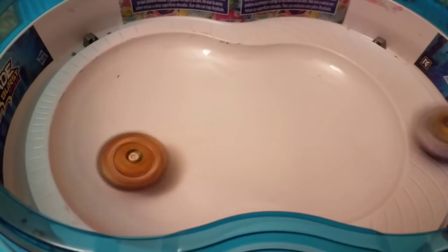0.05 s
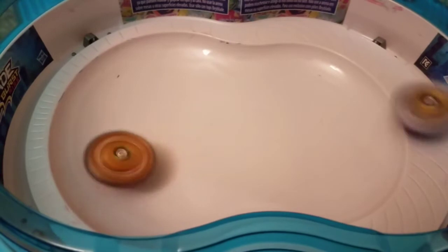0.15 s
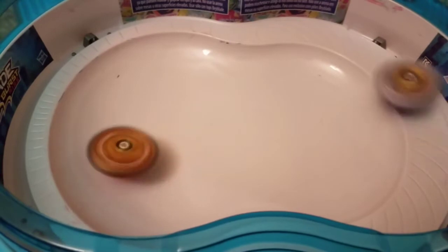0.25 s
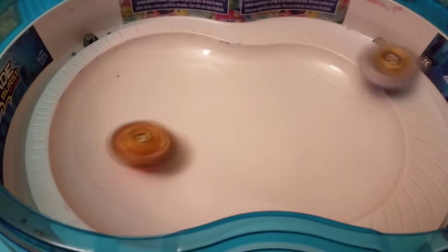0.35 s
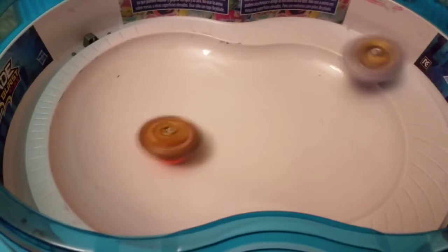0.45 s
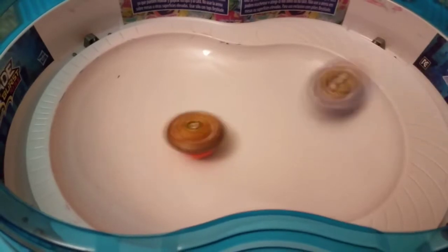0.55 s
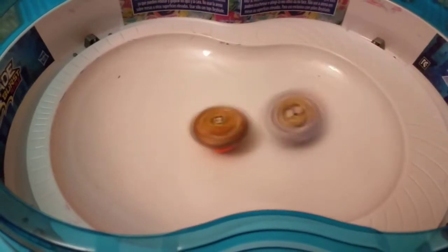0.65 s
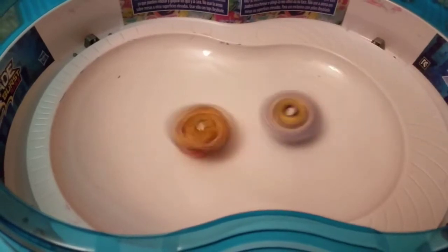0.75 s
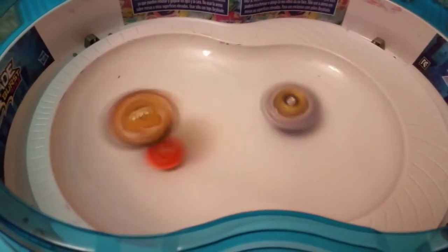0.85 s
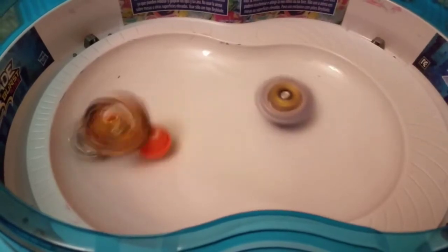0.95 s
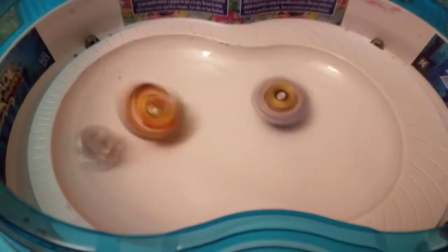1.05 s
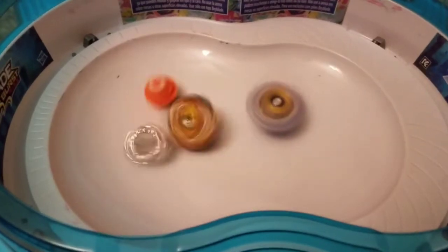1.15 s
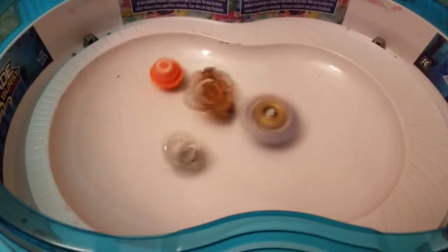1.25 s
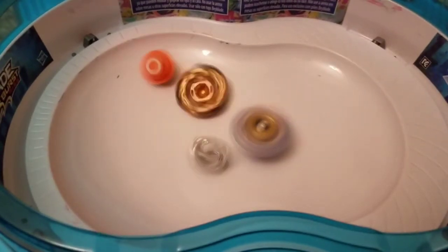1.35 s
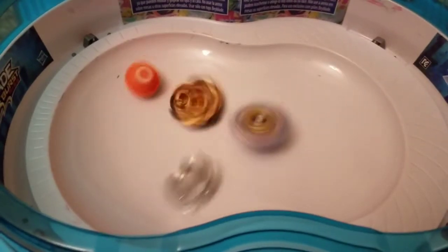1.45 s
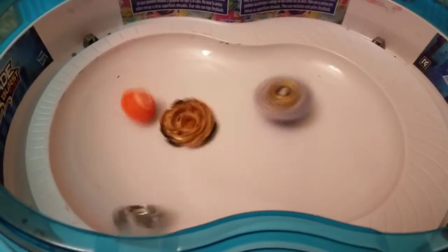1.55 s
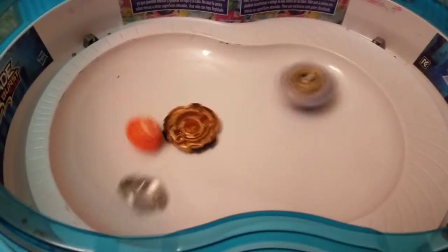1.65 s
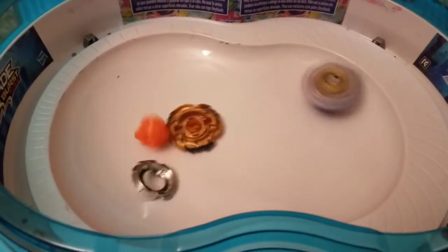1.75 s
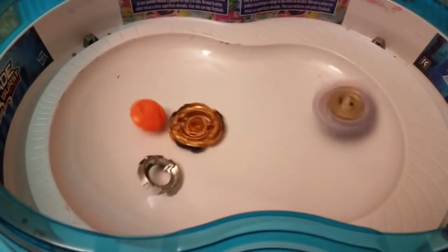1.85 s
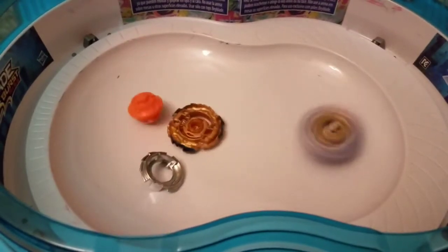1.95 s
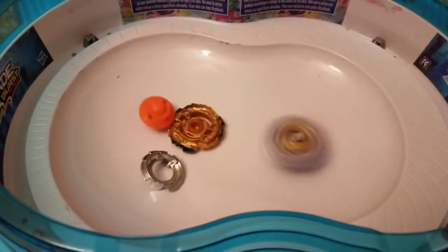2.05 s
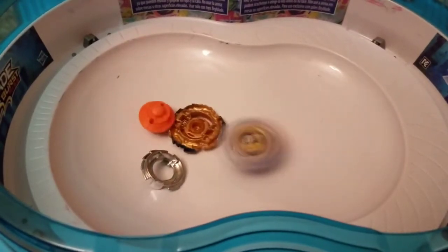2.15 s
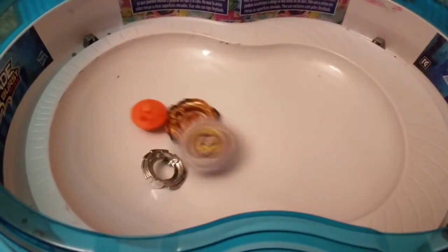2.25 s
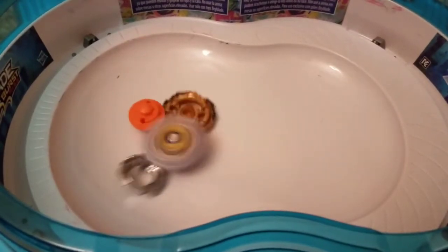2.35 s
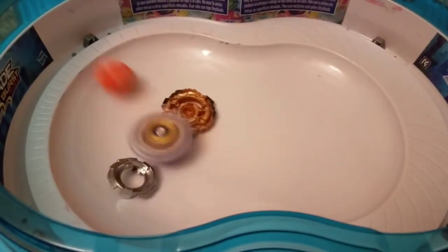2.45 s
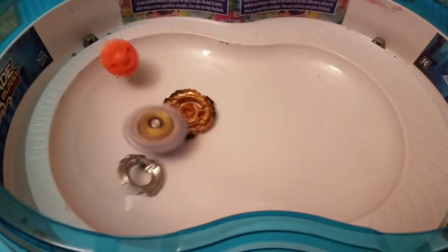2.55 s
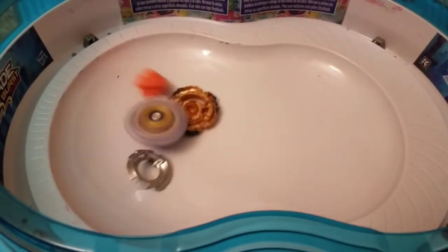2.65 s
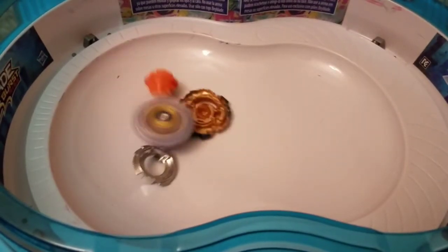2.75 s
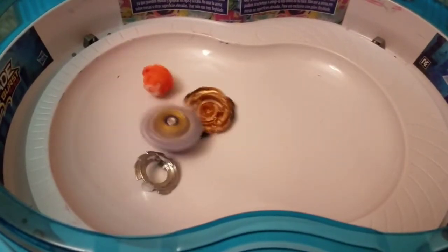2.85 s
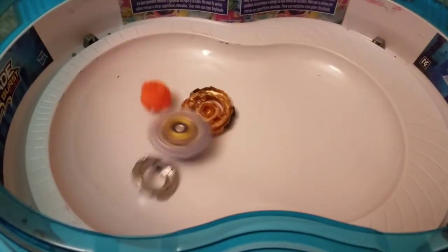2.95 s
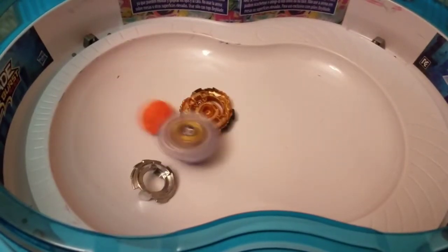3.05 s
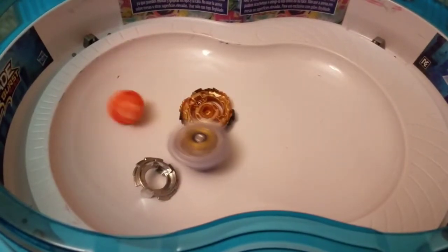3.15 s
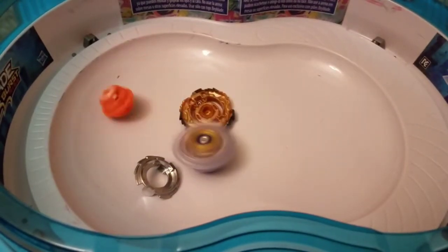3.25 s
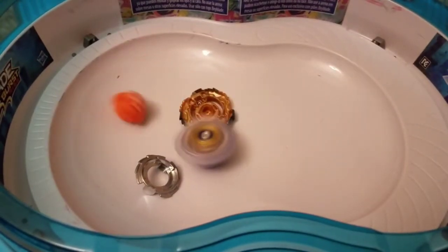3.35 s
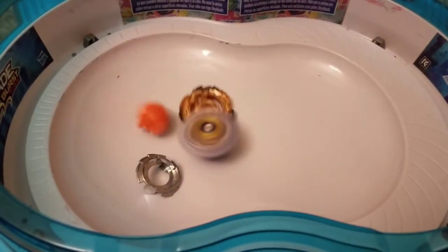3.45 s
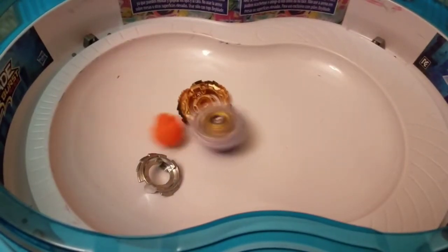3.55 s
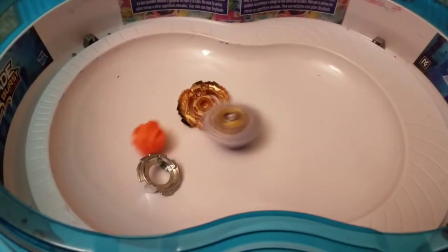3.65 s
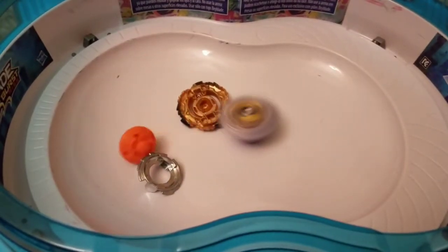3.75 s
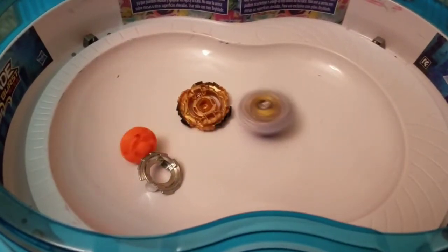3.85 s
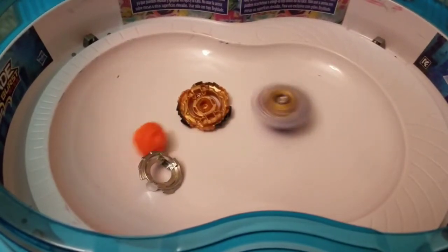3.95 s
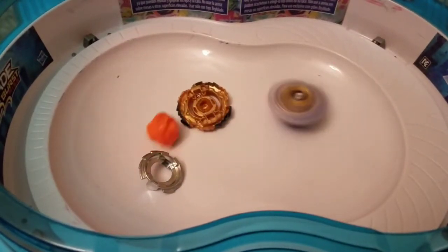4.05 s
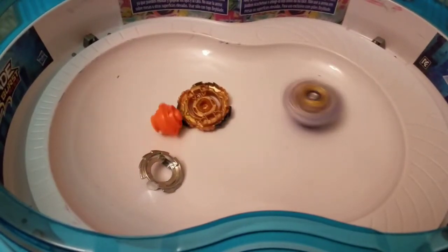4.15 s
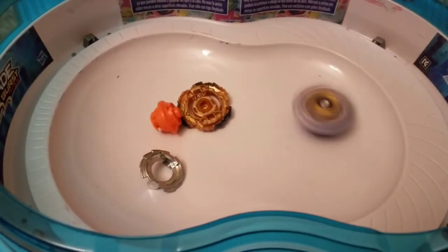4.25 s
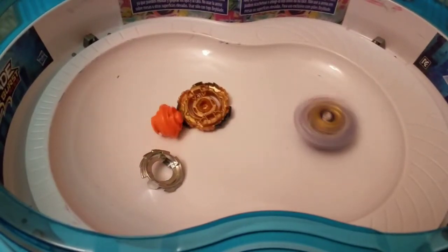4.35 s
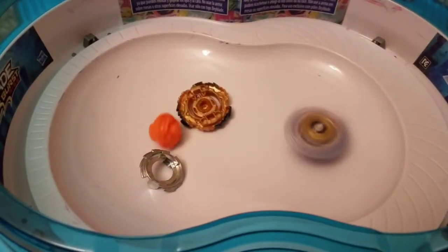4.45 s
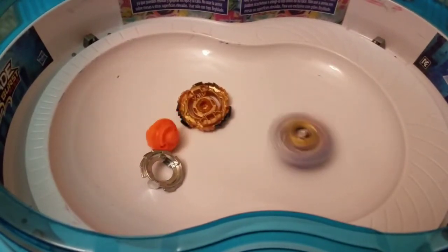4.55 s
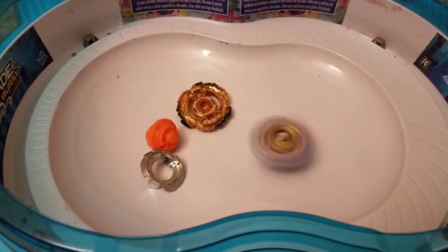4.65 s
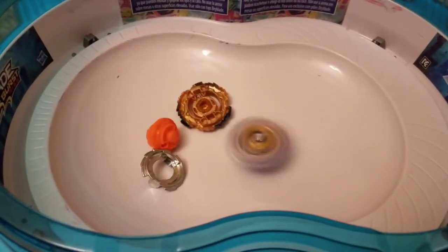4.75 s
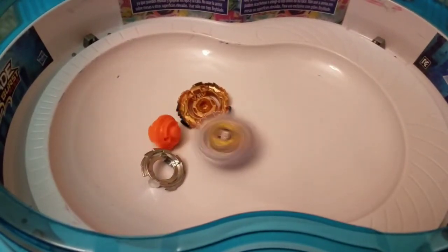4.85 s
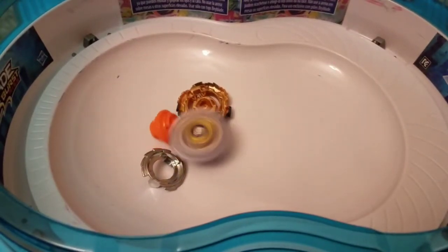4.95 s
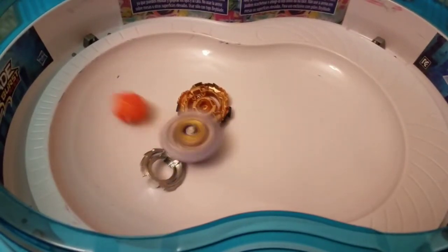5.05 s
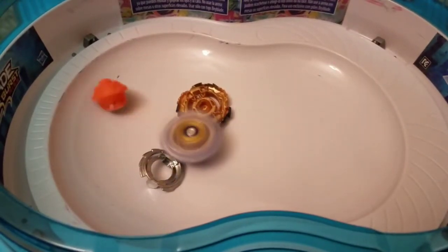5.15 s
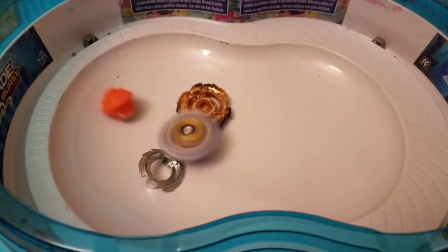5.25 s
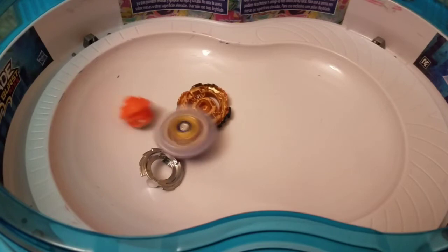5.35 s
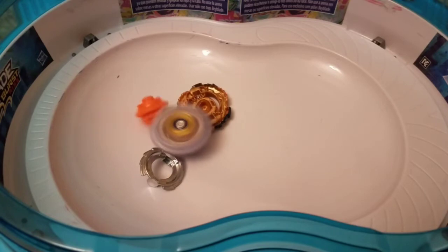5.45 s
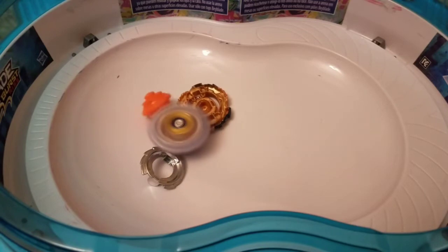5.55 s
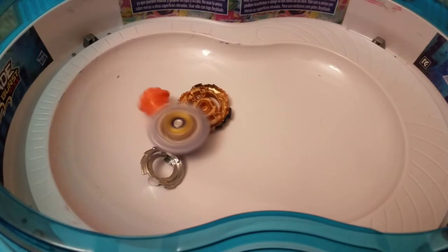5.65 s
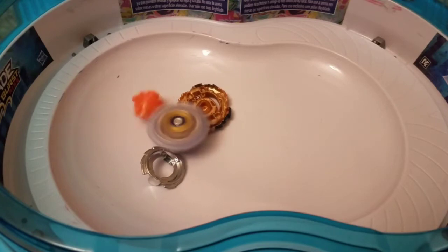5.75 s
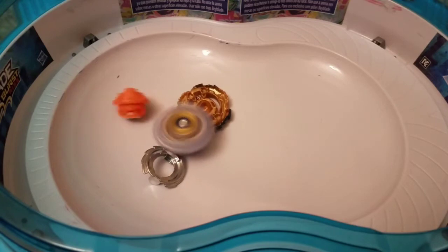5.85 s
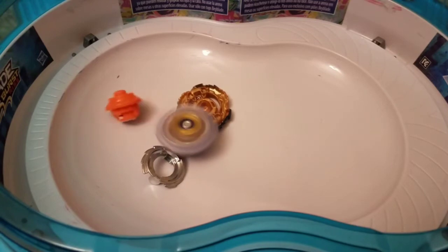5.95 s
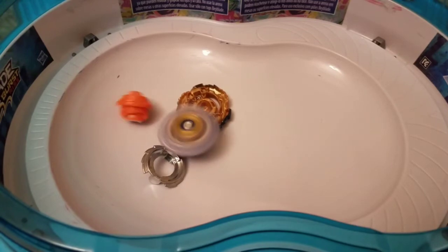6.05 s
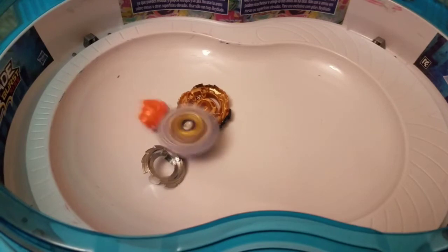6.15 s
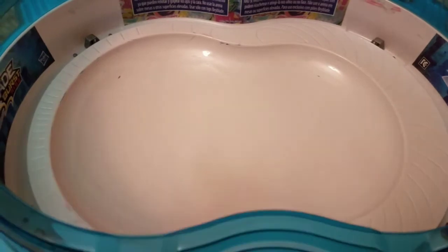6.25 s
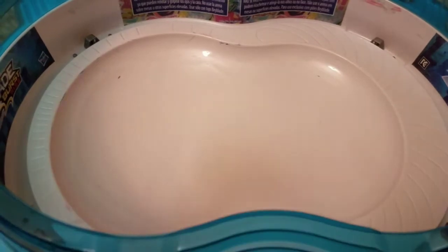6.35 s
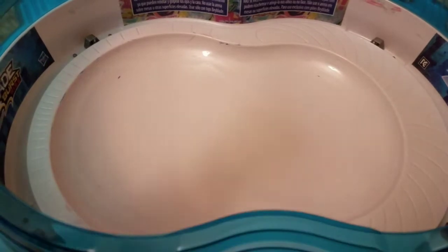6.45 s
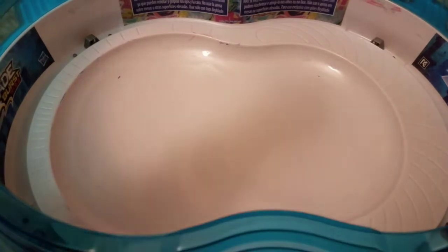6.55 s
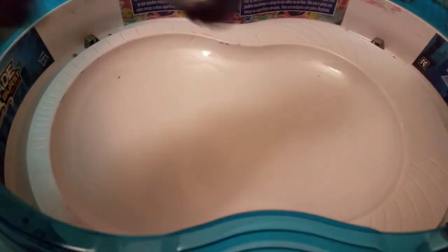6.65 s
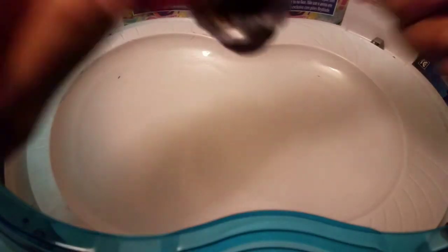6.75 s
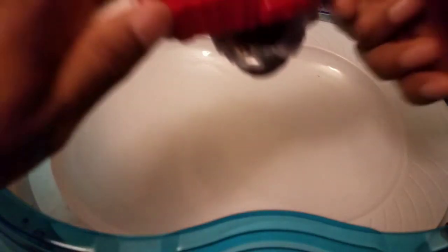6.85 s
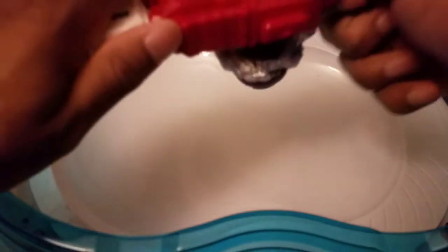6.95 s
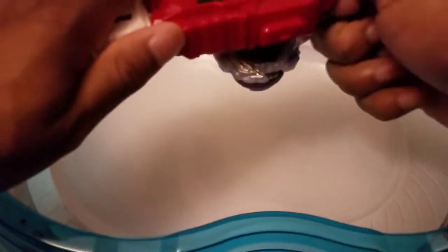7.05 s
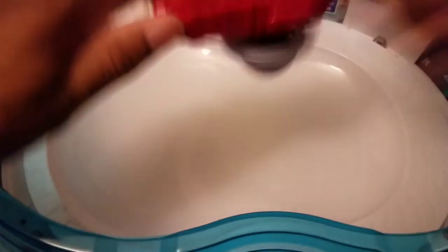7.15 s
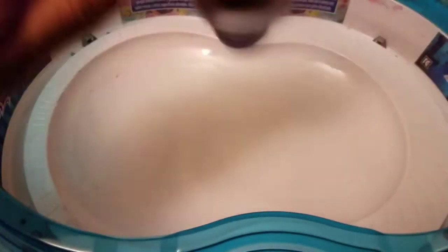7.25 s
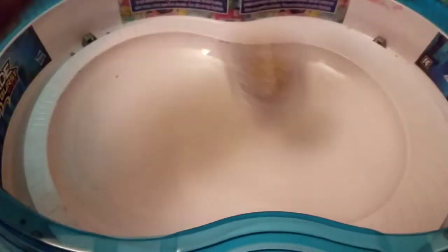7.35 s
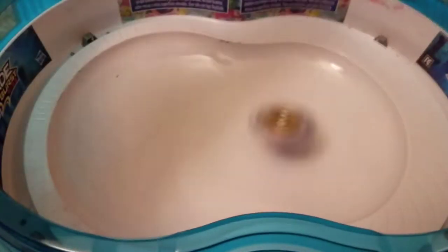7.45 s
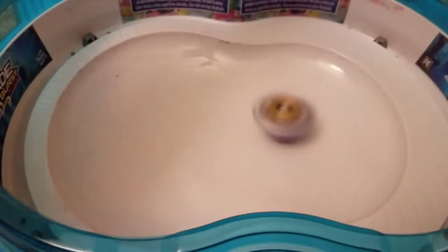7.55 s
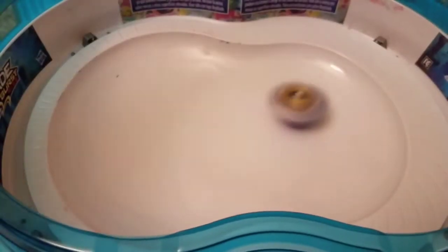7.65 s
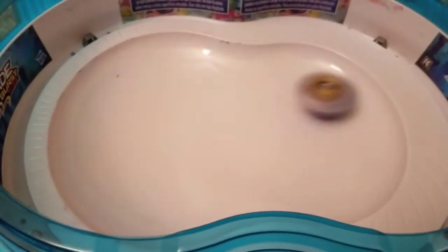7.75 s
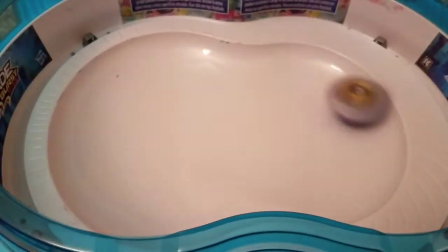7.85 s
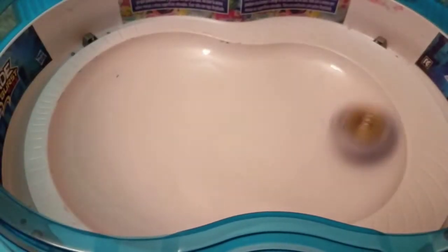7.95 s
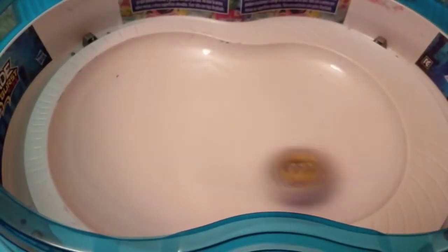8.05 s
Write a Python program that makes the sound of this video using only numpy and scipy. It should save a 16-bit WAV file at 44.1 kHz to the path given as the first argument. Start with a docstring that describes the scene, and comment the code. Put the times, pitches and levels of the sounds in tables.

```python
"""Spinning tops fight in a thin plastic bowl close to a stereo microphone: tips and loose parts knock on the bowl
as short flexing pulses with noisy edges, rims clack as filtered noise bursts, metal discs ring as beating sines.
Stirred parts patter, scrape and shake as filtered grit and noise. A splice cuts the clatter short; a launcher is
handled and clacks, its toothed cord is ripped with a rattle, a hiss and a whir, and a new top lands and hops.
A small room answers with decaying noise over quiet air and a wavering mains hum."""
import sys
import numpy as np
from scipy import signal
from scipy.fft import rfft, irfft, next_fast_len
from scipy.io import wavfile
from scipy.ndimage import map_coordinates

SR = 44100
rng = np.random.default_rng(int(sys.argv[2]) if len(sys.argv) > 2 else 0)


def ratio(d):
    """dB to gain"""
    e = np.asarray(d, float) / 20
    return 10 ** e


def int16_out(signal):
    """Quantize to a 16-bit WAV file."""
    q = np.round(np.clip(np.atleast_2d(signal).T, -1, 1) * 32767)
    wavfile.write(sys.argv[1], SR, q.astype(np.int16))


N = 357210

# Blows on the bowl floor that stand out. Each row: peak time in seconds, relative peak level in dB,
# sharp edge relative to that peak in dB.
KNOCKS = [(0.2447, -23.5, -11.5), (0.262, -26.5, -0.5), (0.3093, -10, -1), (0.3397, -20.5, -1.5),
          (0.5517, -12, -1.5), (.662, -19, -14), (.677, -22.5, -20.5), (.6937, -7, -12.5),
          (0.7017, -2, -23.5), (0.7138, -8, -28), (.764, -9, -12.5), (0.831, -9.5, -10.5),
          (.911, -0.5, -18), (0.9267, -15.5, -8.5), (0.9892, -12, -16), (1.069, -3.5, -10.5),
          (1.098, -20.5, -12), (1.1381, -6, -20), (1.1616, -14, -7), (1.1792, -8, -17.5),
          (1.1977, -14, -19), (1.2416, -6.5, -20.5), (1.2671, -9.5, -11), (1.3219, -13.5, -20),
          (1.3304, -3.5, -3), (1.4061, -6, -18.5), (1.4259, -6.5, -19), (1.448, -16.5, -15),
          (1.5336, -10.5, -10.5), (1.6303, -14, -17), (1.6925, -24, -7.5), (2.0413, -11, -9.5),
          (2.1076, -9, -13.5), (2.1231, -7.5, -14.5), (2.1444, -16.5, 0.5), (2.1763, -12.5, -10.5),
          (2.2169, -12, 1), (2.284, -7.5, -1.5), (2.2968, -12.5, -16.5), (2.3099, -8.5, -11.5),
          (2.3934, -9, -8.5), (2.4115, -3, -14.5), (2.462, -10.5, -15), (2.4786, -5, -10.5),
          (2.5482, -9, -15), (2.5813, -6.5, -22), (2.6258, -13.5, -9), (2.7332, -9, -13), (2.7614, -17, -8),
          (2.7775, -15, -7), (2.7844, -9.5, -19), (2.8403, -9, -10.5), (2.8741, -5.5, -20.5),
          (2.9209, -12.5, -17.5), (2.9655, -16.5, -19), (2.9841, -16, -14), (3.0055, -16, -20),
          (3.0213, -17.5, -15.5), (3.1999, -10.5, -20), (3.2782, -9.5, -8), (3.327, -11.5, -13),
          (3.36, -7.5, -6), (3.4175, -11, -9.5), (3.4903, -14, -15), (3.5121, -27, -8),
          (3.5286, -20.5, -10.5), (3.65, -37, -4.5), (3.724, -22.5, -15.5), (3.739, -21, -19),
          (3.7543, -17.5, -10), (3.839, -27.5, -10.5), (3.8709, -24, -13), (3.8942, -22.5, -22.5),
          (4.2037, -22, -12.5), (4.2236, -22.5, -21.5), (4.2661, -29, -18.5), (4.3223, -27.5, -14),
          (4.7958, -6.5, -13.5), (4.8137, -8, -9), (4.8422, -19.5, -4), (4.8953, -16.5, -10),
          (4.923, -10, -10.5), (4.9489, -14, -15.5), (4.9863, -15.5, -13.5), (5.005, -11, -22.5),
          (5.0246, -18.5, -10.5), (5.081, -26, -20.5), (5.2598, -12, -12), (5.2735, -18, -3),
          (5.2961, -18, -12.5), (5.318, -10, -10), (5.3351, -18, -15), (5.3531, -18, -14),
          (5.3654, -24.5, -5), (5.3851, -15, -4.5), (5.4486, -9.5, -16), (5.4835, -13, -15.5),
          (5.5583, -13, -29), (5.5953, -11, -9.5), (5.6148, -17, -3), (5.638, -10, -14.5), (5.6702, -25, 0),
          (5.9561, -18, -15), (5.9871, -10.5, -16.5), (6.0219, -6.5, -9), (7.062, -21, -8),
          (7.1997, -6.5, -8.5), (7.2141, -12, 4.5), (7.3509, -20, -0.5), (7.3578, -22.5, -9.5),
          (7.5142, -23.5, -12), (7.546, -20, -18.5), (7.5788, -19.5, -11.5), (7.6266, -26, -14.5),
          (7.6585, -21, -15.5), (7.7119, -19, -17.5), (7.745, -23, -7.5), (8.0519, -27.5, -17)]
# Modes of the bowl. Each row: frequency in Hz, width in Hz, relative level in dB.
BOWL = [(81, 71, 1.5), (118.5, 81, 5.5), (225, 190, -1.5), (327, 200, -4), (353, 66.3, -3), (466, 86, -7.5),
        (494, 110, -10.5), (644, 18, -7), (787, 47, -11)]
# Rim contacts, and two clacks of the launcher near 6.93 and 6.96 s. Each row: time in seconds,
# relative level in dB, body relative to the crack in dB.
CLACKS = [(0.309, -32.5, 9.5), (.5, 1.5, -25), (0.6632, -18.5, -12), (0.6736, -15.5, -18.5),
          (0.7128, -8, -9), (0.847, -17, -17), (0.9074, -26, 1.5), (0.9612, -11.5, -23),
          (1.0095, -10, -12.5), (1.0679, -12, -6), (1.0824, -18.5, -22.5), (1.131, -27.5, -3),
          (1.163, 0.5, -31.5), (1.2114, -1, -20), (1.329, -33, 5), (1.4178, -16.5, -25),
          (1.5296, -16.5, -6), (1.5583, -17.5, -18), (1.6273, -34, 8.5), (1.8406, -32.5, 3.5),
          (2.0358, -16.5, -14.5), (2.106, -12.5, -4.5), (2.175, -13, -12.5), (2.2139, -5.5, -17),
          (2.283, -41, 11.5), (2.3923, -20, -4.5), (2.46, -30.5, 7), (2.501, -9, -16), (2.53, -7, -15),
          (2.625, -14, -11.5), (2.759, -10, -15), (2.8725, -3, -15), (2.98, -29.5, 5.5), (3.198, -29, 4),
          (3.2713, -17, -10.5), (3.358, -8, -15.5), (3.7375, -50.5, 19.5), (3.869, -50, 17),
          (4.3191, -39.5, 4.5), (4.795, 1, -10.5), (4.9191, -30.5, -0.5), (5.0036, -22, -3),
          (5.2568, -14, -4.5), (5.3151, -15, -3.5), (5.412, -19.5, -8), (5.4443, -12, -6),
          (5.5605, -4.5, -29), (5.7472, -27, -11), (5.9537, -29, -1), (5.9863, -6, -14),
          (6.0215, -8.5, -10), (6.9272, -25.5, 9), (6.9642, -11, 3.5), (7.198, -24, 9),
          (7.2556, -19.5, -11.5), (7.4187, -2.5, -11.5), (7.5162, -6, -8), (7.5686, -11.5, -11.5)]
# Colour of the crack in a clack. Each row: frequency in Hz, relative level in dB.
CRACK = [(1500, 0), (2500, 10), (4000, 15), (6000, 5.5), (8000, 3), (12000, 6), (15500, 3)]
# Blows that reach a metal disc. Each row: start in seconds, relative level in dB, lift of the lowest mode in dB.
RINGS = [(.712, -27, 3), (.961, -33.5, -5.5), (1.164, -41.5, 7.5), (1.21, -41, -2), (1.53, -48, 4),
         (2.175, -28.5, 8.5), (2.501, -27, -19), (2.872, -35, -2), (3.36, -35.5, 16), (4.319, -62.5, 17),
         (4.795, -24, -41), (5.414, -35, 1.5), (5.476, -34, -8), (5.558, -18.5, 10), (5.744, -51.5, 9)]
# Modes of the disc flung loose. Each row: frequency in Hz, relative level in dB, t60 in seconds.
LOOSE_DISC = [(4818, -16, .4), (6503, -16, .4), (8915, -1, .4), (11520, 0, .35), (12890, -3, .25)]
# Modes of the disc of the standing top. Each row: frequency in Hz, relative level in dB, t60 in seconds.
TOP_DISC = [(4554, -25, .5), (6029, -22, .2), (8468, -20, .18), (8829, -13, .25), (9803, -14, .1),
            (12680, 0, .06), (14020, -4, .055)]
# Time in which the loose disc is the one that rings: start in seconds, end in seconds.
LOOSE_SPAN = (.65, 1.7)
# Rolling and skidding of the tips; near 7.3 s the second level is the whir of the launcher cord.
# Each row: time in seconds, rolling level in dB, skidding or whir level in dB.
TRAVEL = [(0, -40, -60.5), (.2, -55, -61), (.42, -47.5, -45.5), (.62, -45.5, -50), (1.75, -51, -58.5),
          (1.95, -34.5, -44), (3.1, -39, -55.5), (3.95, -50.5, -70), (4.15, -57, -64), (4.6, -46, -64.5),
          (5.2, -50.5, -55.5), (6.05, -42, -61.5), (6.08, -83, -68), (7.0, -82, -67), (7.3, -64, -35),
          (7.48, -39, -44.5), (7.65, -30.5, -45), (7.82, -35.5, -47.5), (7.87, -40, -46.5),
          (7.95, -36, -38.5), (8.01, -46, -51.5), (8.06, -36, -41), (8.1, -47, -51)]
# Colour of skidding, whir and scraping. Each row: frequency in Hz, relative level in dB.
SCRAPE = [(530, -29), (900, 2), (1030, -3), (1240, -2.5), (2430, -7.5), (6660, -22), (8370, -38),
          (14700, -33), (15800, -23)]
# Toothed cord, then the gears running out. Each row: time in seconds, rattle level in dB.
CORD = [(6.9, -86.5), (6.926, -34.5), (6.98, -15), (7.04, -17.5), (7.11, -37.5), (7.18, -40.5),
        (7.272, -36), (7.33, -28), (7.46, -57)]
# Modes of the launcher shell. Each row: frequency in Hz, width in Hz, relative level in dB.
SHELL = [(1257, 410, 4), (2160, 89, -2), (2500, 1100, -6.5), (3330, 1400, 2), (4200, 340, 2),
         (6100, 780, -2.5)]
# Handling of the launcher. Each row: start in seconds, relative level in dB, pitch in Hz, ringing share from 0 to 1.
HANDLING = [(6.2207, -22.5, 1880, 0.23), (6.3069, -20, 2510, 0.31), (6.65, -41, 1170, 0.2),
            (6.693, -23.5, 1330, 0.56), (6.75, -36.5, 1110, 0.4), (6.795, -36.5, 1370, .3)]
# The launch jolts the ground under the bowl. Each row: start in seconds, starting level in dB.
JOLTS = [(6.991, -45), (7.066, -39), (7.205, -20), (7.352, -25)]
# Decay of the room. Each row: frequency in Hz, t60 in seconds.
ROOM = [(150, 0.84), (600, 0.076), (2000, 0.29), (6000, 0.19), (15000, 0.14)]
# Left-right likeness of the room. Each row: frequency in Hz, likeness from -1 to 1.
ALIKE = [(300, 0.93), (700, 0.34), (1500, 0.27), (3000, -0.39), (12000, 0.38)]
# Colour of the quiet air. Each row: frequency in Hz, relative level in dB.
AIR = [(15, -40), (30, -26.5), (60, -20), (90, -23.5), (105, -17), (123, -10), (148, -23), (211, -23),
       (450, -24), (1000, -35), (4450, -45.5), (15800, -45)]
# Mains hum ahead of its waver and stereo tilt. Each row: time in seconds, level in dB.
HUM = [(0, -85), (1.5, -39), (4, -43.5), (6, -46.5), (6.4, -51.5), (6.8, -65), (8.1, -52)]

SPLICE_S = 6.062
EDGE_TREBLE_DB = -13.5  # crack in the sharp edge of a blow
# small hops between the blows: gain on the stir and on rolling, scatter, edge
HOPS_PER_S, HOP_STIR_DB, HOP_ROLL_DB, HOP_SPREAD_DB, HOP_EDGE_DB = 42, -7, 12, 16.5, -10
# every blow stirs the parts; the stir builds and settles exponentially
STIR_RISE_S, STIR_SETTLE_S = 0.0067, 0.038
LONE_STIR_DB = -7.5  # after the splice: a single top landing stirs less
# gain of rolling, scraping and shaking on the stir; gain of shaking on free rolling
STIR_ROLL_DB, STIR_SCRAPE_DB, STIR_SHAKE_DB, ROLL_SHAKE_DB = -24.5, -46, -32.5, -19.5
ROLL_HZ, ROLL_WIDTH_HZ, ROLL_LIFT_DB = 385, 65, 7.5  # the floor mode that a steadily running tip favours
# heavy loose parts lie on the floor from here; before and after them its bass is weak
LOOSE_FROM_S, WHOLE_CUT_HZ = 1.37, 181
CORD_TREBLE_DB, CORD_TREBLE_GROWS = -2.5, 1.05  # hiss over rattle at the strongest pull; dB per dB of pull
JOLT_HZ, JOLT_T60_S = 67.5, 0.07
HUM_HZ = 119.5
TOP_HZ = 15800


def unit(x):
    """Scaled to rms 1."""
    return x / np.sqrt(np.mean(x ** 2) + 1e-20)


def along(points, hz):
    """Value at each frequency, read from (Hz, value) points on a log axis."""
    f, v = np.transpose(points)
    return np.interp(np.log(hz + 1), np.log(f + 1), v)


def curves(rows):
    """One value per sample for each column after the time."""
    s, *columns = np.transpose(rows)
    return [np.interp(np.arange(N) / SR, s, column) for column in columns]


def filtered(x, response):
    """The sound with its spectrum multiplied by a complex response of frequency."""
    size = next_fast_len(N + SR // 2)
    return irfft(rfft(x, size) * response(np.fft.rfftfreq(size, 1 / SR)), size)[..., :N]


def bass_cut(f, cut_hz):
    """Response of two first-order high-passes in a row."""
    return (1j * f / (cut_hz + 1j * f)) ** 2


def resonances(modes):
    """Response of causal (Hz, width, dB) resonances, summed with alternating sign."""
    def response(f):
        total = 0
        for k, (hz, width, db) in enumerate(modes):
            total = total + (-1) ** k * ratio(db) * 1j * f * width / (hz * hz - f * f + 1j * f * width)
        return total
    return response


def grit(rate, spread_db):
    """Random tiny impacts, rate a second, of scattered size and either sign; rms 1."""
    chance, sign, size = rng.random((3, N))
    return unit((chance < rate / SR) * np.sign(sign - .5) * ratio(spread_db * size))


def add(track, s, sound):
    """Mix a sound in at time s."""
    i = round(s * SR)
    track[i:i + len(sound)] += sound[:len(track) - i]


def ports(x, lead_s, left_db):
    """The two microphone ports: the left hears it earlier by lead_s and differs in level by left_db."""
    side = np.array([[1], [-1]])
    return ratio(side * left_db / 2) * filtered(x, lambda f: np.exp(side * 1j * np.pi * f * lead_s))


def knocks():
    """Each blow flexes the floor for a cycle and a half around its peak, then the bowl hums on."""
    dents, edges, lead_s = np.zeros(N), np.zeros(N), .004
    t = np.arange(SR // 40) / SR - lead_s  # zero at the peak
    since = t + 0.0012  # the noisy edge starts ahead of the peak
    blows = KNOCKS + hops()
    for (s, db, edge_db), a in zip(blows, rng.random(len(blows))):
        hz = 380 + 100 * a
        dent = np.cos(2 * np.pi * hz * t) * np.exp(-(t * hz / 0.62) ** 2)
        add(dents, s - lead_s, ratio(db) * dent)
        fade = ratio(db + edge_db + 11.5 - 60 * since / 0.023) * (since > 0)
        add(edges, s - lead_s, fade * rng.standard_normal(len(t)))

    def edge_colour(f):
        flex = resonances([(950, 900, 0.01)])(f) * resonances([(1100, 1600, 0.01)])(f)
        return flex + resonances([(3200, 4000, EDGE_TREBLE_DB)])(f)

    bowl_hum = ratio(-15) * filtered(dents, resonances(BOWL))
    return dents + filtered(edges, edge_colour) + bowl_hum


def hops():
    """Random small blows, as strong as the parts are stirred; a freely rolling tip hops with softer edges."""
    rolling, skidding, stir = activity()
    jitter, size, edge = rng.random((int(N / SR * HOPS_PER_S) - 1, 3)).T
    s = (np.arange(len(jitter)) + .5 + jitter) / HOPS_PER_S
    at = np.minimum(s * SR, N - 1).astype(int)
    hard = ratio(2 * HOP_STIR_DB) * stir[at] + 1e-12
    soft = ratio(2 * HOP_ROLL_DB) * rolling[at]
    peak_db = 10 * np.log10(hard + soft) - HOP_SPREAD_DB * size
    edge_db = HOP_EDGE_DB + 12 * (edge - .5) + 10 * np.log10(hard / (hard + soft))
    return list(zip(s, peak_db, edge_db))


def activity():
    """Power of rolling, of skidding (or the cord's whir) and of the stir that the blows leave behind."""
    blows, t = np.zeros(N), np.arange(SR) / SR
    for s, db, edge_db in KNOCKS:
        blows[round(s * SR)] += ratio(2 * db)
    shape = np.exp(-t / STIR_SETTLE_S) * (1 - np.exp(-t / STIR_RISE_S))
    spliced = np.arange(N) > SPLICE_S * SR
    # no stir carries over the splice
    stir = sum(part * np.abs(signal.fftconvolve(blows * part, shape)[:N]) for part in (spliced, ~spliced))
    stir = stir * ratio(2 * LONE_STIR_DB * spliced)
    rolling_db, skidding_db = curves(TRAVEL)
    return ratio(2 * rolling_db), ratio(2 * skidding_db), stir


def loaded(x):
    """The floor sounds deep only while loose parts weigh on it."""
    t = np.arange(N) / SR
    loose = np.clip((t - LOOSE_FROM_S) / 0.13, 0, 1) * (t < SPLICE_S + .1)
    return loose * x + (1 - loose) * filtered(x, lambda f: bass_cut(f, WHOLE_CUT_HZ))


def clacks():
    """Hard rims or launcher parts crack, a plastic body answers lower, and chatter follows three times, ever weaker."""
    crack, body, t = np.zeros(N), np.zeros(N), np.arange(SR // 20) / SR
    for (s, db, body_db), draw in zip(CLACKS, rng.random((len(CLACKS), 3, 2))):
        delays = np.r_[0, np.cumsum(.006 + .02 * draw[:, 0])]
        losses_db = np.r_[0, np.cumsum(7 + 9 * draw[:, 1])]
        for delay, loss_db in zip(delays, losses_db):
            noise = rng.standard_normal((2, len(t))) * (1 - np.exp(-t / 0.0015))
            crack_fade = ratio(db - loss_db - 4.5 - 60 * t / 0.013)
            body_fade = ratio(db - 0.5 * loss_db + body_db + 18.5 - 60 * t / 0.012)
            add(crack, s + delay - .001, crack_fade * noise[0])
            add(body, s + delay - .001, body_fade * noise[1])
    crack = filtered(crack, lambda f: ratio(along(CRACK, f)))
    return crack + filtered(body, resonances([(1777, 2000, -2.0), (3400, 800, 0.5)]))


def discs():
    """A struck metal disc rings at new strengths; its split mode pairs beat; where it is hit sets the lowest mode."""
    ring, t = np.zeros(N), np.arange(SR // 2) / SR
    for s, db, low_db in RINGS:
        disc = LOOSE_DISC if LOOSE_SPAN[0] < s < LOOSE_SPAN[1] else TOP_DISC
        for (hz, level_db, t60), (a, b) in zip(disc, rng.standard_normal((8, 2))):
            beat = 1 + 0.52 * np.cos(2 * np.pi * (25 + 8 * b) * t)
            rough = .012 * np.cumsum(rng.standard_normal(len(t)))  # loose seating blurs the pitch
            level_db = level_db + low_db * (hz == disc[0][0])
            fade = ratio(db + level_db + 1.6 * a - 60 * t / t60)
            add(ring, s, fade * beat * np.sin(2 * np.pi * hz * t + rough))
    return ring


def motion():
    """Tips roll and skid smoothly, the cord whirs; stirred parts patter, scrape in gritty grains and shake the floor."""
    free, skid, stir = activity()

    def soft_tip(f):
        return resonances(BOWL)(f) / (1 + (f / 1400) ** 2)

    def steady_tip(f):
        return soft_tip(f) * (4 + resonances([(ROLL_HZ, ROLL_WIDTH_HZ, ROLL_LIFT_DB)])(f))

    def floor_shake(f):
        return resonances([(105, 120, 0.01)])(f) ** 2

    def scrape_colour(f):
        return ratio(along(SCRAPE, f))

    contact = .6 * grit(220, spread_db=8) + .8 * rng.standard_normal(N)
    rolling = np.sqrt(free) * unit(filtered(contact, steady_tip))
    tumble = 2.1 * grit(220, spread_db=21.0) + 0.4 * rng.standard_normal(N)
    patter = ratio(STIR_ROLL_DB) * np.sqrt(stir) * unit(filtered(tumble, soft_tip))
    shake = np.sqrt(ratio(2 * ROLL_SHAKE_DB) * free + ratio(2 * STIR_SHAKE_DB) * stir)
    shaking = shake * unit(filtered(rng.standard_normal(N), floor_shake))
    # near 7.3 s this smooth noise is the whir of the cord
    skid_or_whir = np.sqrt(skid) * unit(filtered(rng.standard_normal((2, N)), scrape_colour))
    grains = np.array([1.2 * grit(400, spread_db=21.0) + 0.41 * rng.standard_normal(N) for port in "LR"])
    scraping = ratio(STIR_SCRAPE_DB) * np.sqrt(stir) * unit(filtered(grains, scrape_colour))
    return ports(loaded(rolling + patter + shaking), .00004, -1.8) + skid_or_whir + scraping


def launcher():
    """Teeth of the cord rattle the shell and hiss; fingers make it tick beforehand."""
    level_db, = curves([(0, -120), (6.89, -120)] + CORD + [(7.5, -120)])
    strongest_db = level_db.max()
    treble_db = strongest_db + CORD_TREBLE_DB + CORD_TREBLE_GROWS * (level_db - strongest_db)
    teeth = grit(900, spread_db=8)
    both = np.array([0.81 * teeth + 0.6 * rng.standard_normal(N) for port in "LR"])
    rattle = ratio(level_db) * unit(filtered(both, lambda f: resonances(SHELL)(f) * bass_cut(f, 600)))
    hiss = ratio(treble_db) * unit(filtered(both, lambda f: (f / 5500) ** 3 / (1 + (f / 5500) ** 3)))
    ticks, t = np.zeros(N), np.arange(SR // 20) / SR
    for s, db, hz, share in HANDLING:
        tone = np.sin(2 * np.pi * hz * t) * ratio(-60 * t / 0.02)
        rub = rng.standard_normal(len(t)) * ratio(-60 * t / 0.028) * (1 - np.exp(-t / 0.0046))
        add(ticks, s, ratio(db) * (share * tone + (1 - share) * rub))
    return rattle + hiss, filtered(ticks, lambda f: bass_cut(f, 600) / (1 + 1j * f / 5000))


def jolts():
    """A dull low push that dies within a few cycles."""
    thud, t = np.zeros(N), np.arange(SR // 4) / SR
    for s, db in JOLTS:
        add(thud, s, ratio(db - 60 * t / JOLT_T60_S) * np.sin(2 * np.pi * JOLT_HZ * t))
    return thud


def room(x):
    """Each frequency dies at its own speed; the moving sources meet a new answer every quarter second."""
    wet, step = np.zeros((2, N + SR)), SR // 4
    for i in range(0, N, step):
        hz, t, (a, b) = signal.stft(rng.standard_normal((2, SR // 2)), SR, nperseg=256)
        # mixing two noises by an angle sets how alike the ports are; long waves reach both alike
        turn = np.arccos(np.clip(along(ALIKE, hz), -1, 1))[:, None] / 2
        pair = np.array([np.cos(turn) * a + np.sin(turn) * b, np.cos(turn) * a - np.sin(turn) * b])
        decay = ratio(-60 * t / along(ROOM, hz)[:, None])
        tail = signal.istft(pair * decay, SR, nperseg=256)[1]
        answer = signal.fftconvolve(x[None, i:i + step], tail / np.linalg.norm(tail[0]), axes=1)
        wet[:, i + 90:i + 90 + answer.shape[1]] += answer  # 90 samples, about 2 ms, late
    return wet[:, :N]


def background():
    """Quiet air as coloured noise, and mains hum as a sine of wavering level."""
    air = ratio(-63.5) * unit(filtered(rng.standard_normal((2, N)), lambda f: ratio(along(AIR, f))))
    nodes = rng.standard_normal(int(N / SR * 6) + 4)  # six a second
    waver_db = 1.3 * map_coordinates(nodes, [np.arange(N) * 6 / SR])
    hum = ratio(curves(HUM)[0] + waver_db) * np.sin(2 * np.pi * HUM_HZ * np.arange(N) / SR)
    return air + hum * ratio([[-.8], [.8]])


def scene():
    """The fight rings until the splice; the launch follows."""
    low, high, ring = loaded(knocks()), clacks(), discs()
    cord, ticks = launcher()
    t = np.arange(N) / SR
    fight = np.clip((SPLICE_S - t) / .005, 0, 1)
    launch = t > SPLICE_S + .1
    source = ratio(-4) * low + ratio(-3.5) * high + ratio(-4) * ring
    fight_wet = room(source * fight) * fight  # the splice cuts the room's tail too
    launch_wet = ratio(-0.5) * room(source * launch + ratio(-9) * ticks + ratio(1.0) * cord[0])
    bright = (high + ring * fight) * (fight + launch) + ticks
    close = ports(low, .00004, -1.8) + ports(bright, .00015, -0.36)
    return close + fight_wet + launch_wet + cord + motion() + jolts() + background()


def band_limit(x):
    """A steep low-pass at the top of the band."""
    return signal.sosfilt(signal.butter(12, 16970, fs=SR, output="sos"), x)


def record(dry):
    """The microphone path rolls off the bass, stops at a band limit and clips softly."""
    limited = filtered(dry, lambda f: (f < TOP_HZ) * bass_cut(f, 45))
    mix = limited / (1 + np.abs(limited) ** 8) ** (1 / 8)
    return band_limit(mix)


dry = scene()
out = record(dry)
int16_out(out)
```